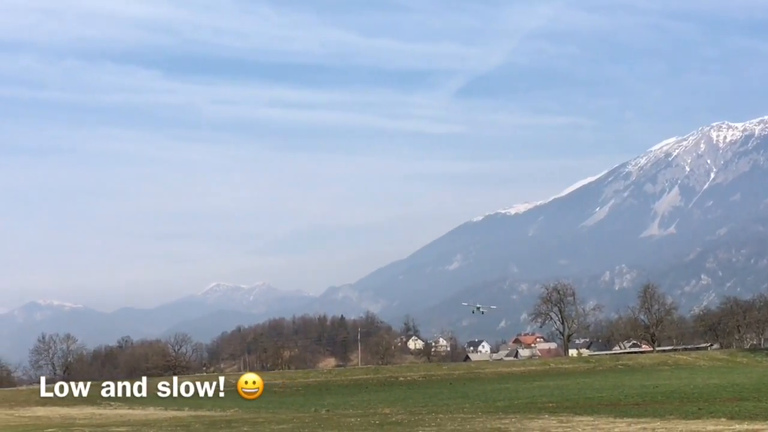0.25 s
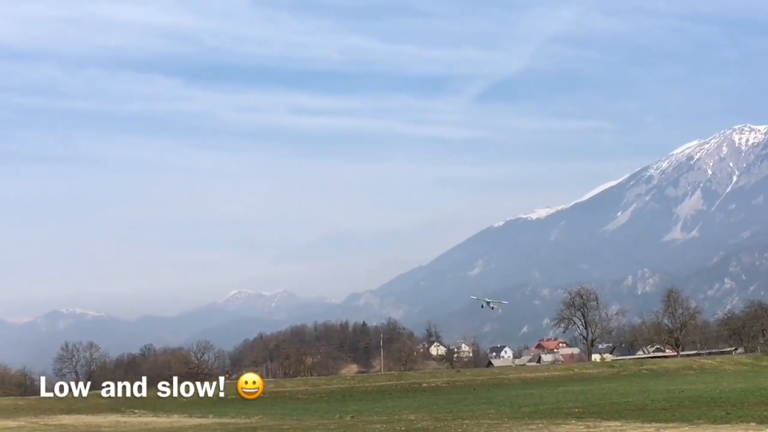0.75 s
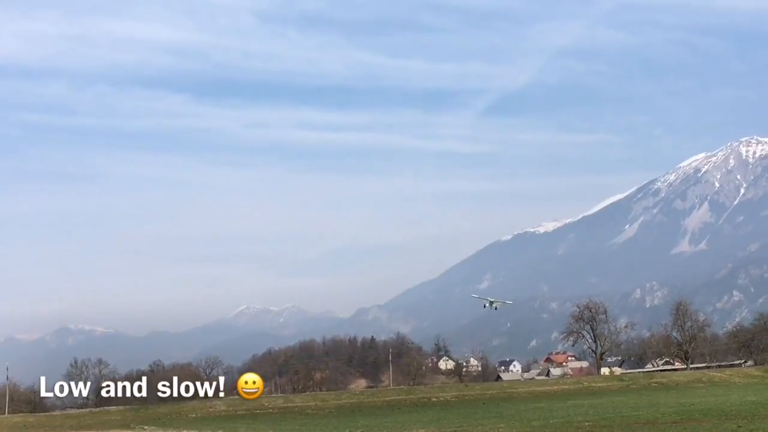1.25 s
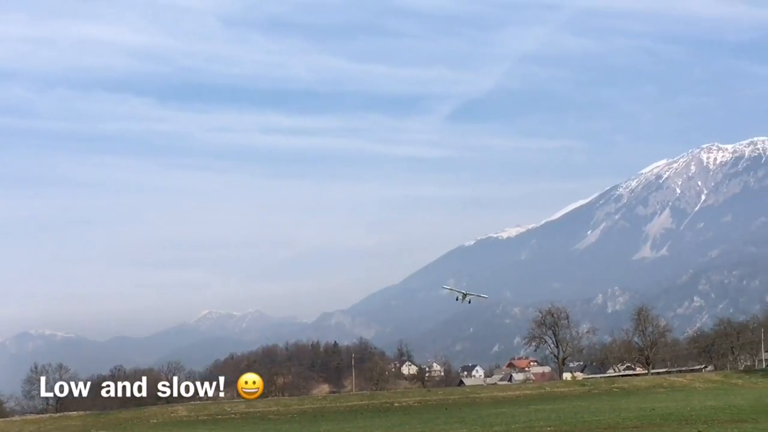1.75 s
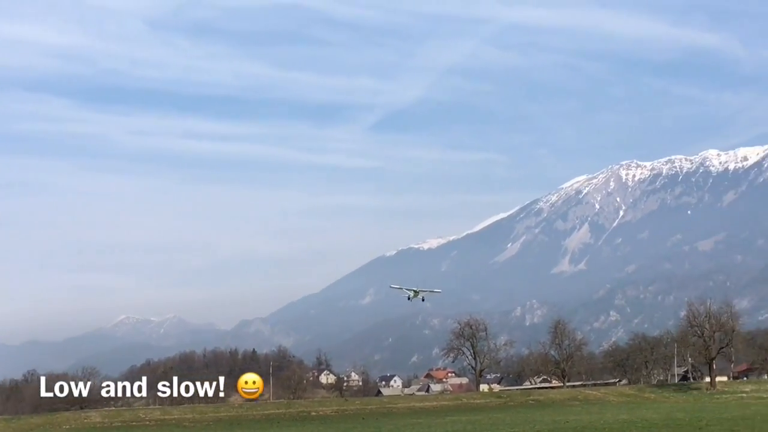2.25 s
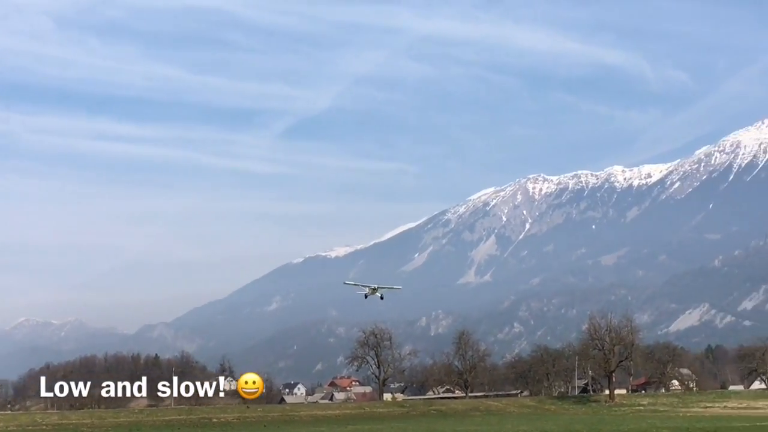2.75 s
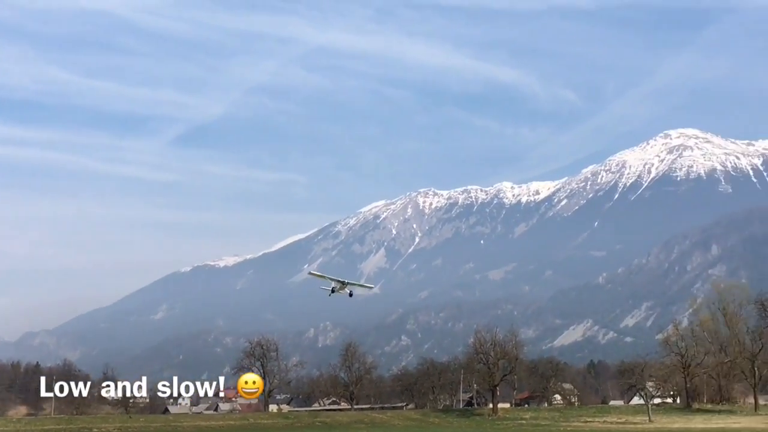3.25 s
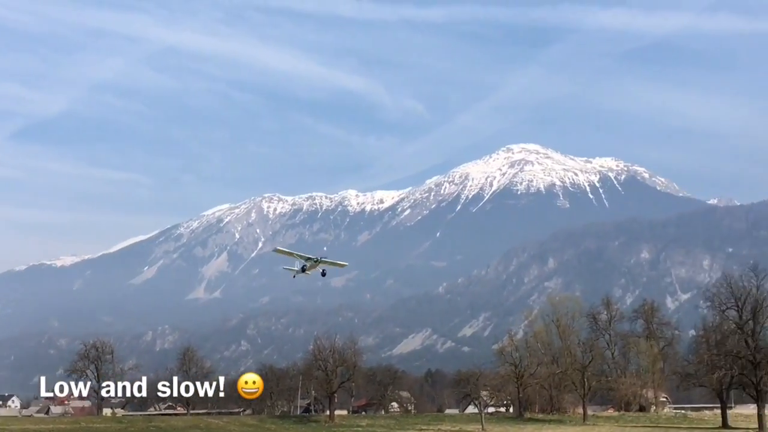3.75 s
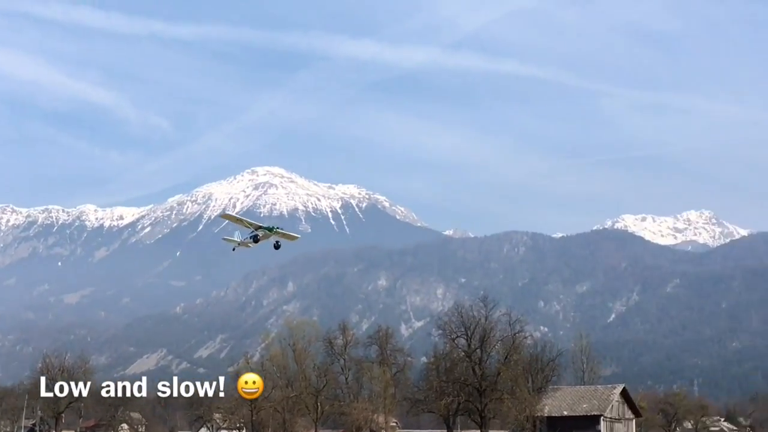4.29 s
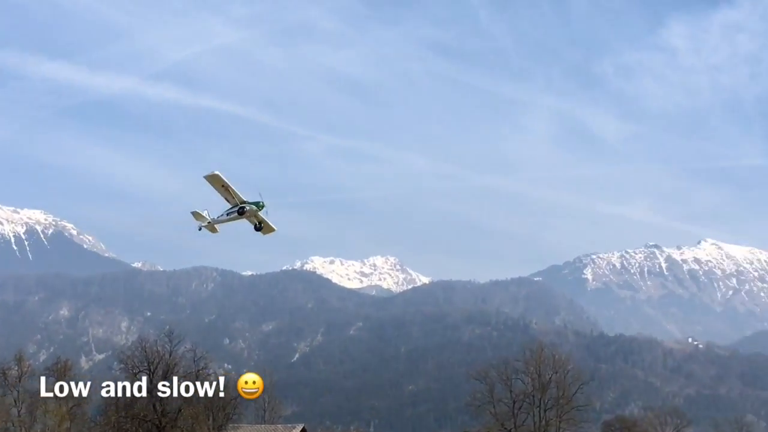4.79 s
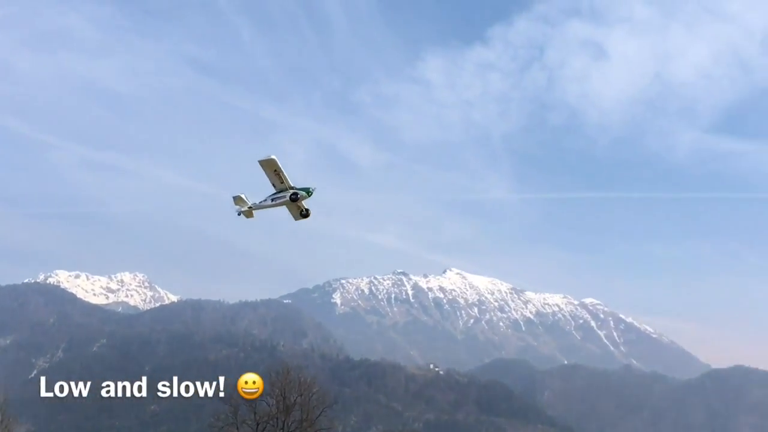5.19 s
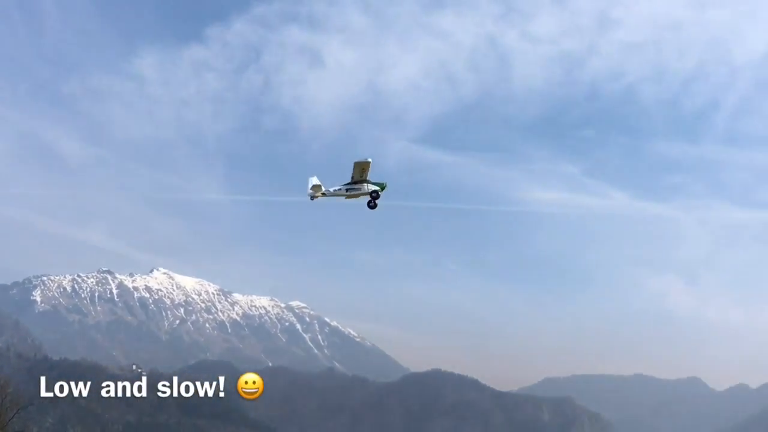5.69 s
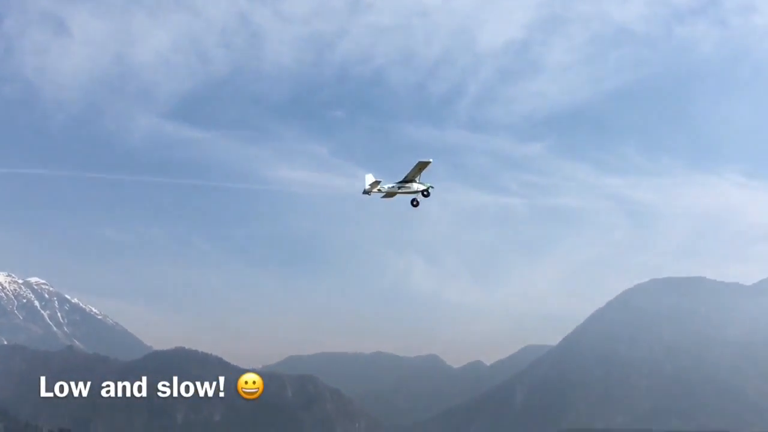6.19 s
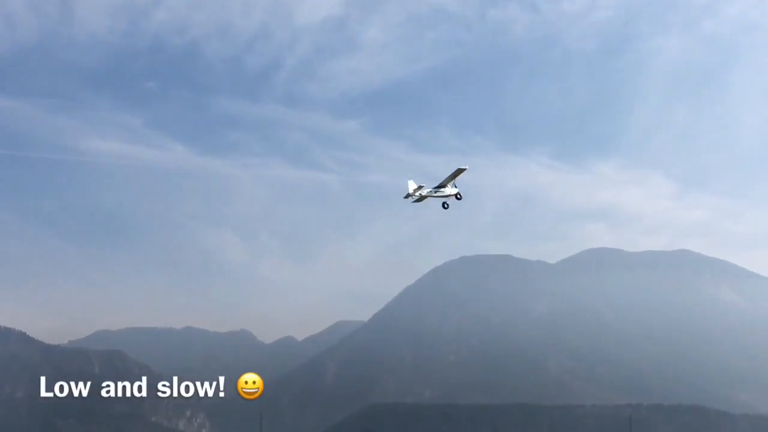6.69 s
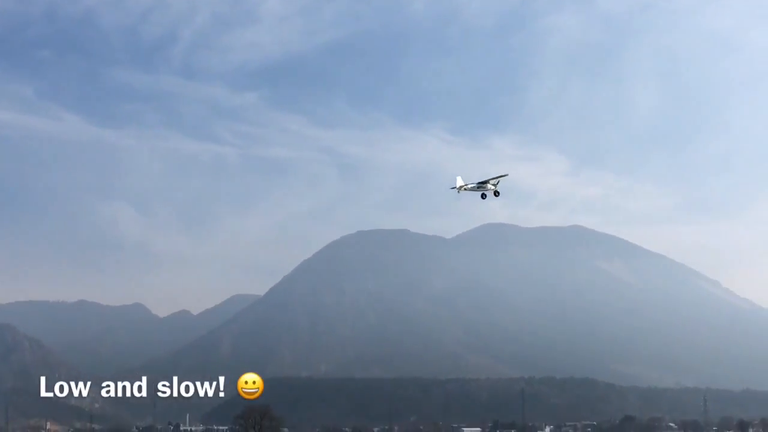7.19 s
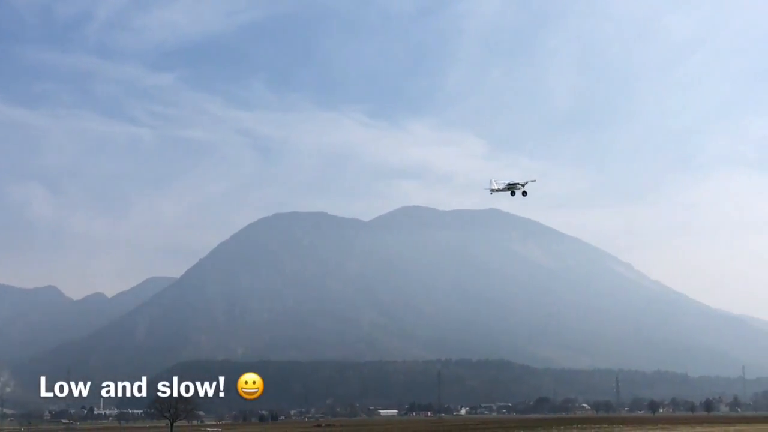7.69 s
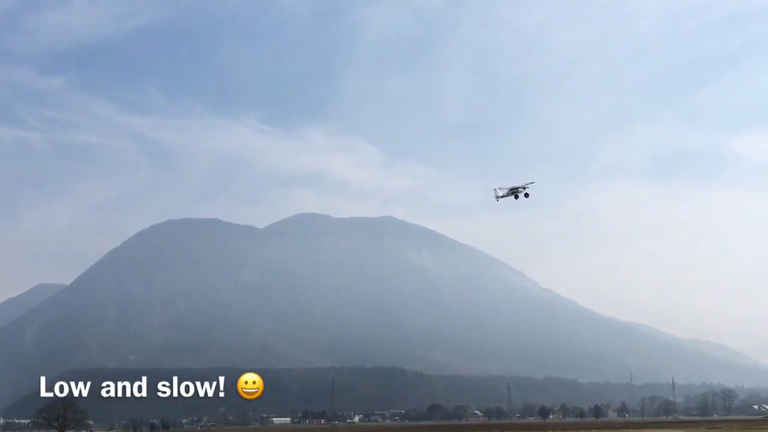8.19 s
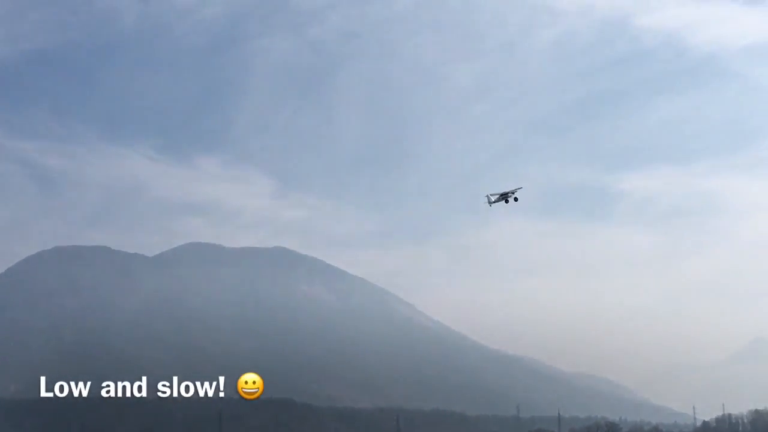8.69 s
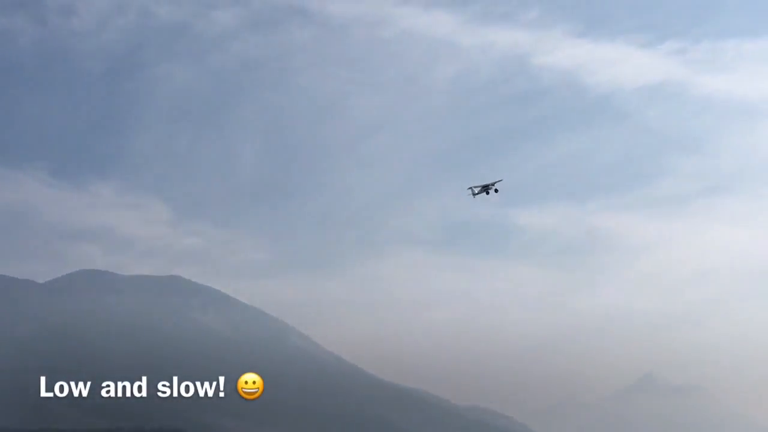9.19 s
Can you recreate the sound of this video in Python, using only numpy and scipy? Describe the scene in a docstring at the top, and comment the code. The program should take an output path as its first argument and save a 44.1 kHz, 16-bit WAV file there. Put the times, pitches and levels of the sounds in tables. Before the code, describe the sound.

Thin electric motor whine and propeller buzz swell past outdoors, sag, then spin up and climb away beneath heavy, low wind buffeting.

```python
"""An open field, microphone 1.5 m above the grass: a small electric plane comes in low, with a brief swell of noise
at the start. A far engine drones up from about 1 s. The 14-pole motor whines on multiples of the shaft speed, and its
speed controller adds a switching tone with sidebands; the propeller buzzes, swishes and hisses, echoed by the ground.
The plane is nearest at 5.27 s, throttles back, then spins up from about 7.4 s to climb away.
Wind rumbles throughout; gusts and eddies, sparse at first and crowded from 4.7 s, buffet the microphone."""
import sys
import numpy as np
from scipy.fft import rfft, irfft, next_fast_len
from scipy.io import wavfile
from scipy.ndimage import map_coordinates

SR = 44100
rng = np.random.default_rng(int(sys.argv[2]) if len(sys.argv) > 2 else 0)


def wav_record(signal):
    """Record a signal, one row per channel, as 16-bit PCM in the file named by sys.argv[1]."""
    frames = np.transpose(np.atleast_2d(signal))
    bounded = np.clip(frames, -1, 1)
    # unit amplitude maps onto the largest positive 16-bit level
    quanta = np.round(bounded * 32767).astype(np.int16)
    wavfile.write(sys.argv[1], SR, quanta)


N = 416744

SOUND_M_PER_S, CRUISE_TURNS_PER_S = 343, 78
# switching tone of the speed controller as heard, gliding down by Doppler shift as the plane passes [t/s, f/Hz]
SWITCHING_TONE = [(0, 7954), (2, 7947), (2.98, 7945), (3.84, 7921), (4.56, 7876), (5.38, 7748), (6.2, 7663),
                  (6.94, 7607), (8.6, 7569), (9.45, 7574)]


def amp(db):
    """Decibels to gain."""
    return 10 ** (np.asarray(db) / 20)


def unit(x):
    """x at rms 1."""
    return x / np.sqrt(np.mean(x ** 2) + 1e-20)


def along(points, hz):
    """(f/Hz, value) points read on a log frequency axis."""
    f, v = np.transpose(points)
    return np.interp(np.log(hz + 1), np.log(f + 1), v)


def curves(rows):
    """One value per sample for each column after the time."""
    s, *cols = np.transpose(rows)
    return [np.interp(np.arange(N) / SR, s, c) for c in cols]


def wobble(rate):
    """A smooth random curve with rate knots a second."""
    knots = rng.standard_normal(1024)
    coarse = np.arange(0, N + 128, 128)  # the curve is worked out every 128 samples
    values = map_coordinates(knots, [coarse * rate / SR], mode="wrap")
    return np.interp(np.arange(N), coarse, values)


def filtered(x, response):
    """x times a response of frequency."""
    size = next_fast_len(N + SR // 4)
    spectrum = rfft(x, size) * response(np.fft.rfftfreq(size, 1 / SR))
    return irfft(spectrum, size)[:N]


def noise(spectrum):
    """Noise of rms 1 with the given colour."""
    white = rng.standard_normal(N)
    return unit(filtered(white, lambda hz: amp(along(spectrum, hz))))


def angle(hz):
    """Running phase of a moving frequency."""
    return 2 * np.pi * np.cumsum(hz) / SR


def tone(phase, db):
    """A sine of the given rms level, from a random starting phase."""
    return np.sqrt(2) * amp(db) * np.sin(phase + rng.uniform(0, 2 * np.pi))


def swell_db(rows):
    """Dips and swells of level, each a smooth bell."""
    t = np.arange(N) / SR
    return sum(db * np.exp(-((t - s) / half) ** 2) for s, half, db in rows)


def flight(pass_s=5.27, distance_m=11, speed_m_per_s=8.665, mic_height_m=1.5):
    """A straight pass at steady speed: nearness in dB, angle off the nose in degrees, lag of the ground echo in s."""
    # the plane climbs [t/s, height/m]
    height = [(0, 1.46), (1, 1.43), (2, 3.54), (3, 3.37), (3.7, 3.35), (4.4, 3.5), (5.1, 3.98), (6.5, 5.7),
              (7.2, 6.23), (8.4, 13), (9.45, 13.8)]
    ahead_m = speed_m_per_s * (pass_s - np.arange(N) / SR)
    range_m = np.hypot(distance_m, ahead_m)
    near_db = 20 * np.log10(distance_m / range_m)
    aspect = np.degrees(np.arctan2(distance_m, ahead_m))
    echo_lag = 2 * mic_height_m * curves(height)[0] / range_m / SOUND_M_PER_S
    return near_db, aspect, echo_lag


def countryside(opening_db=-61.5, opening_s=0.25, valley_db=-68):
    """The soft, even roar of the valley, a brief swell of noise at first, and a far engine as one gliding sine."""
    # a far engine gathering speed [t/s, f/Hz, relative level/dB]
    far_engine = [(1.1, 62, -66), (1.3, 66, -49.5), (1.8, 81, -49.5), (2.2, 89, -52.5), (2.85, 98, -45),
                  (3.2, 99, -72), (4.2, 100, -61), (4.7, 104, -49.5), (5.4, 110, -56.5)]
    # colour of the valley's roar [f/Hz, level/dB per Hz]
    valley_colour = [(100, -36), (250, 1.5), (450, -1), (700, -2), (950, 8), (1400, -0.5), (1900, 0.5),
                     (2400, -10), (5000, -14.5), (15000, -39.5)]
    hz, db = curves(far_engine)
    drone = tone(angle(hz * (1 + 0.013 * wobble(10))), db - 0.5 + 1.5 * wobble(7.3))
    opening = .5 - .5 * np.tanh((np.arange(N) / SR - opening_s) / 0.033)
    opening_colour = [(500, -11), (750, -2), (950, 1.5), (1400, -4), (1900, -26)]
    swell = opening * amp(opening_db) * noise(opening_colour)
    valley = amp(valley_db + 0.29 * wobble(1.74)) * noise(valley_colour)
    return drone + swell + valley


def mount_lift(hz):
    """Decibels gained by a tone that passes through the resonances of the motor and its mount."""
    # resonances and one notch [f/Hz, width/Hz, lift/dB]
    resonances = [(1050, 330, 0), (1650, 140, 15), (2986, 61, 6), (3450, 200, 8.5), (5220, 370, -10),
                  (6203, 316, 12.5)]
    return sum(db / (1 + (2 * (hz - centre) / width) ** 2) for centre, width, db in resonances)


def leading_tones(speed, near_db, aspect, flutter_db=1.24, fading_db=2.6, twin_db=-4, twin_reach_hz=130,
                  throb_depth=0.053, mount_peak_db=13):
    """The strong magnetic tones throb once a turn, flutter in turbulent air and sweep lobes past the microphone."""
    # the three loudest whines, shaft orders 14, 21, 42, rise and fall during the pass [t/s, relative level/dB]
    pole_tone = [(0, -65.5), (.4, -64.5), (.6, -69), (2.55, -67), (3.26, -69.5), (3.8, -55), (4.32, -61.5),
                 (4.72, -49), (5.28, -57), (5.66, -67), (6.4, -53.5), (6.98, -52.5), (7.66, -64),
                 (8.3, -60), (9.45, -58)]
    phase_tone = [(0, -62), (.3, -65.5), (1.02, -75), (1.74, -74), (2.4, -65.5), (3.36, -68.5),
                  (3.92, -56.5), (4.6, -61), (5.02, -47.5), (5.5, -56.5), (5.76, -52.5), (6.46, -52.5),
                  (7.1, -65), (7.5, -56), (7.75, -70), (8.05, -59.5), (8.64, -66.5), (9.45, -57.5)]
    commutation_tone = [(0, -74), (.2, -76), (.28, -58.5), (.8, -64), (1.14, -73.5), (1.5, -59),
                        (1.8, -54.5), (2.45, -64), (2.87, -51.5), (3.15, -58), (3.48, -50.5), (3.8, -60.5),
                        (4.5, -47.5), (4.82, -56), (5.08, -49), (5.35, -59), (5.52, -48), (5.9, -48),
                        (6.8, -50), (7.16, -62), (7.36, -51.5), (7.56, -52), (7.64, -46.5), (7.82, -56.5),
                        (8.28, -46), (8.68, -57), (9.04, -48), (9.45, -48)]
    # brief drop-outs of the loudest whine, order 42 [t/s, half length/s, level/dB]
    whine_dips = [(3.73, .05, -7), (3.92, .04, -9), (4.15, 0.034, -15), (5.65, 0.049, -13), (7.84, .05, -8),
                  (8.1, 0.033, -7.5)]
    # surges and sags of the ring of shaft order 49 [t/s, half length/s, level/dB]
    ring_swells = [(.05, 0.13, 1), (5.52, 0.057, 6), (5.75, 0.098, -9), (6.35, .12, -10), (6.6, 0.092, 8),
                   (7.03, 0.067, 5), (7.6, 0.36, -14)]
    # where the other leading tones lie [multiple of the switching tone, shaft order]
    positions = [(0, 49), (1, 0), (1, -21), (1, -42)]
    # how each of those radiates [relative level/dB, gain ahead/dB, gain along the axis/dB,
    # power of the shaft speed, lobe depth/dB, lobe spacing/deg, lobe aim/deg off the nose]
    radiation = [(-51.5, 2, -31, -9, 14.5, 143, 143), (-50.5, 1.6, -9.5, 1.5, 5, 52.6, 88.7),
                 (-60, 3.5, 1.9, -3, 6, 65, 85.6), (-63.5, -6.5, 2, -0.2, 4, 32.8, 99.4)]

    switching, = curves(SWITCHING_TONE)
    ahead = np.cos(np.radians(aspect))
    speed_db = 20 * np.log10(speed / CRUISE_TURNS_PER_S)
    whines = [(0, 14, curves(pole_tone)[0]),
              (0, 21, curves(phase_tone)[0]),
              (0, 42, curves(commutation_tone)[0] + swell_db(whine_dips))]
    for (carrier, order), row in zip(positions, radiation):
        level_db, ahead_db, axial_db, power, lobe_db, spacing, aim = row
        lobes = np.cos(2 * np.pi * (aspect - aim) / spacing)
        pattern_db = ahead_db * ahead + axial_db * ahead ** 2 + lobe_db * lobes
        db = level_db + near_db + pattern_db + power * speed_db + fading_db * wobble(8)
        whines.append((carrier, order, db))

    # at low throttle shaft order 105 meets the switching tone:
    # sidebands then lie beside orders 21 and 49 and beat with them
    beat_hz = switching - 105 * speed
    beat_db = twin_db - 20 * np.log10(1 + (beat_hz / twin_reach_hz / 2) ** 2)
    out = np.zeros(N)
    for carrier, order, db in whines:
        hz = carrier * switching + order * speed
        db = db + flutter_db * wobble(30) + 0.59 * wobble(11) - .6
        if order == 49:
            db = db + swell_db(ring_swells)
        if order == -21:  # this sideband is loud only inside the mount's top resonance
            db = db + mount_lift(hz) - mount_peak_db
        out += tone(angle(hz), db)
        if order in (21, 49):
            out += tone(angle(hz + beat_hz), db + beat_db)
    return out * (1 + throb_depth * np.cos(angle(speed)))


def lesser_tones(speed, loud_db, aspect, beam_db=6.0, treble_db=-3, fading_db=3.0, sideband_low_hz=1800):
    """Weak shaft orders and sidebands ring through the mount; the high ones beam forward, low sidebands die out."""
    # where the lesser magnetic tones lie [multiple of the switching tone, shaft order]
    positions = [(0, 13), (0, 16), (0, 18), (0, 19), (0, 63), (0, 84), (1, -63), (1, -17), (1, -19),
                 (1, -4), (1, -2), (1, 2), (1, 4), (1, 6), (1, 8), (1, 14)]
    # their strengths, row by row, before mount and distance [relative level/dB]
    strengths_db = [-69, -76.5, -76.5, -74, -68, -67.5, -70, -75.5, -78, -114, -87, -75, -93, -101, -74,
                    -69]
    switching, = curves(SWITCHING_TONE)
    forward_db = treble_db + beam_db * np.cos(np.radians(aspect))
    out = np.zeros(N)
    for (carrier, order), strength_db in zip(positions, strengths_db):
        hz = carrier * switching + order * speed
        treble = np.clip((hz - 4500) / 1500, 0, 1)
        # carrier is 0 for plain shaft orders, which lose nothing
        loss_db = carrier * 10 * np.log10(1 + ((sideband_low_hz / hz) ** 2) ** 2)
        db = strength_db + loud_db + treble * forward_db - loss_db + mount_lift(hz)
        out += tone(angle(hz), db + fading_db * wobble(8))
    return out


def propeller_buzz(speed, near_db, fading_db=4.5, count=46):
    """A slightly unbalanced propeller sounds the multiples of the shaft speed, here from the second up."""
    # strength of the buzz lines before mount and distance [f/Hz, relative level/dB]
    line_strength = [(150, -69), (300, -79.5), (450, -70), (600, -68), (740, -73.5), (880, -65),
                     (1020, -87), (1130, -64.5), (1300, -85), (1850, -82), (2200, -103), (3200, -76.5),
                     (3900, -86), (5000, -75)]
    turn = angle(speed)
    out = np.zeros(N)
    for order in range(2, count):
        hz = order * speed
        db = along(line_strength, hz) + mount_lift(hz) + 2.12 * near_db - 5.0
        out += tone(order * turn, db + fading_db * wobble(6))
    return out


def propeller_air(speed, near_db, aspect, blade_depth=0.16, shaft_depth=0.28, chop_depth=0.5,
                  gusty_db=1.28, slow_db=0.47):
    """Turbulence shed by the two blades, pulsing as they come round."""
    # the propeller's air noise [t/s, swish relative level/dB, tip sizzle relative level/dB]
    air_levels = [(0, -78, -75), (.2, -85, -71), (.37, -78, -64.5), (1.55, -86, -62), (1.87, -88, -59),
                  (2.3, -77, -63), (2.75, -74, -60), (3.5, -69, -54), (4.0, -65.5, -54.5), (4.1, -67, -56),
                  (4.35, -66, -50.5), (5.15, -58.5, -52.5), (5.6, -64.5, -58.5), (6.22, -69, -57.5),
                  (6.7, -67.5, -59), (6.9, -68.5, -62), (7.05, -69, -59.5), (7.17, -73, -65.5),
                  (7.45, -70, -57.5), (7.75, -70, -64), (8.2, -72, -64.5), (8.8, -74, -70.5),
                  (9.45, -70, -67.5)]
    # colours of the air noise, from low to high [f/Hz, level/dB per Hz]
    wash_colour = [(150, 6.5), (400, -12.5), (700, -5.5), (1000, -8), (1500, -3), (2000, -7), (2800, -19.5)]
    swish_colour = [(1500, -51), (2100, -6), (2600, -1.5), (2850, -2), (3100, 6), (3400, -3.5), (3800, -3),
                    (4300, -10.5), (5200, -13.5)]
    hiss_colour = [(3500, 0.5), (4400, -1), (5050, -5.5), (5700, 2.5), (6300, 4.5), (7100, -1), (8000, 2.5),
                   (9000, 1), (10300, 1), (12000, -13)]
    sizzle_colour = [(9000, -28), (10400, -19), (11000, 3.5), (11800, -0.5), (13200, 3), (14500, -1),
                     (15400, 0.5), (16000, -2)]

    swish_db, sizzle_db = curves(air_levels)
    ahead = np.cos(np.radians(aspect))
    # mid treble follows the sizzle: offset abeam, gain ahead, gain along the axis
    hiss_db = sizzle_db - 9.5 - 1.5 * ahead + 1.5 * ahead ** 2
    turn = angle(speed)
    wash = amp(near_db - 60 + 0.27 * wobble(5.2)) * noise(wash_colour)
    swish = amp(swish_db + 7.0) * noise(swish_colour)
    hiss = amp(hiss_db + 7.0) * noise(hiss_colour)
    sizzle = amp(sizzle_db + 0.5) * noise(sizzle_colour)
    chop = 1 + chop_depth * np.cos(2 * turn)  # two blades: twice a turn
    pulsing = 1 + blade_depth * np.cos(2 * turn) + shaft_depth * np.cos(turn)
    flicker = amp(gusty_db * wobble(20) + slow_db * wobble(12))
    return chop * (wash + swish) + pulsing * flicker * (hiss + sizzle)


def over_grass(x, lag, share=0.36, dull_hz=6500):
    """A dulled ground echo whose lag follows height and distance, so a comb sweeps through the sound."""
    t = np.arange(N) / SR
    echo = filtered(x, lambda hz: 1 / (1 + (hz / dull_hz) ** 2))
    return x + share * np.interp(t - lag, t, echo)


def wind(lumps_db=6.5, surge_db=1.0, calm_buffet_db=-64, breeze_db=-51, breeze_rise_db_per_s=0.85,
         attack_s=0.018, release_s=0.04):
    """Wind on the microphone: a slowly rising rumble, and gusts that lift it together with lumpy buffeting."""
    # gusts, one envelope for both layers [t/s, hold/s, rumble relative level/dB, buffet relative level/dB]
    gusts = [(0.287, 0.035, -43, -49), (1.474, 0.034, -41.5, -50), (4.688, 0.043, -36, -38.5),
             (4.8, 0.023, -41, -44), (4.922, 0.14, -42.5, -42), (5.08, .05, -37.5, -51),
             (5.76, 0.17, -40.5, -47.5), (5.873, 0.13, -36.5, -45.5), (6.27, 0.038, -33, -46),
             (6.378, 0.18, -38, -33.5), (6.59, 0.14, -36, -41), (6.744, 0.12, -36, -37),
             (6.996, 0.22, -32, -29.5), (7.105, .13, -29.5, -28.5), (7.316, 0.068, -37.5, -39.5),
             (7.436, .13, -29.5, -40), (7.636, 0.059, -29.5, -35), (7.793, 0.025, -38.5, -60),
             (7.91, 0.056, -34, -29), (8.06, 0.055, -36.5, -41), (8.19, 0.028, -33.5, -51),
             (8.29, 0.011, -39, -54), (8.552, .05, -34.5, -41), (8.653, 0.063, -38, -29.5),
             (8.763, .1, -33.5, -30), (8.93, 0.079, -35, -34.5), (9.01, 0.14, -32, -30),
             (9.206, 0.085, -34.5, -29.5), (9.336, 0.042, -35, -32)]
    # colours of the two layers [f/Hz, level/dB per Hz]
    rumble_colour = [(15, -42), (30, -11), (50, 5), (85, 2), (130, -8), (200, -22.5), (400, -56),
                     (900, -72)]
    buffet_colour = [(30, -20), (70, -6.5), (130, 3.5), (200, -2.5), (300, -12), (450, -23.5), (800, -44),
                     (2000, -81)]
    t = np.arange(N) / SR
    rumble = amp(breeze_db + breeze_rise_db_per_s * t)
    buffet = np.full(N, amp(calm_buffet_db))
    for start, hold, rumble_db, buffet_db in gusts:
        corners = [start - attack_s, start, start + hold, start + hold + release_s]
        gust = np.interp(t, corners, [0, 1, 1, 0])
        rumble = np.maximum(rumble, amp(rumble_db) * gust)
        buffet = np.maximum(buffet, amp(buffet_db) * gust)
    surging = unit(noise(rumble_colour) * amp(surge_db * wobble(18)))
    lumpy = unit(noise(buffet_colour) * amp(lumps_db * wobble(55)))
    return amp(-0.5) * rumble * surging + amp(-2) * buffet * lumpy


def slaps(sharpness=0.76, ragged=0.16, gain_db=-1):
    """Each eddy that slaps the microphone is one push and pull of pressure with a ragged edge."""
    # single eddies [t/s, relative peak level/dB, swing f/Hz before the sharpness factor]
    eddies = [(0.293, -30.5, 122), (1.494, -35, 109), (4.69, -33, 85), (4.915, -19.5, 122),
              (5.024, -21.5, 139), (5.959, -18.5, 121), (6.399, -21, 157), (6.434, -25.5, 200),
              (6.501, -19.5, 181), (6.73, -26, 143), (7.067, -19, 203), (7.112, -11, 243),
              (7.157, -13, 190), (7.228, -21.5, 209), (7.407, -18, 109), (7.453, -18, 113),
              (7.51, -14, 113), (7.552, -18, 110), (7.683, -12.5, 172), (7.909, -18, 124),
              (8.072, -29, 128), (8.203, -25.5, 177), (8.293, -30.5, 200), (8.664, -21.5, 100),
              (8.694, -22, 224), (8.765, -21, 131), (8.836, -11.5, 150), (9.113, -19, 220)]
    out = np.zeros(N)
    t = np.arange(-SR // 20, SR // 20) / SR
    for s, db, hz in eddies:
        u = 2 * np.pi * hz * t * sharpness
        swing = -np.tanh(u) / np.cosh(u)  # peaks at 1/2, hence the 2 below
        first = round(s * SR) - len(t) // 2
        out[first:][:len(t)] += 2 * amp(db + gain_db) * swing
    out *= 1 + ragged * noise([(50, 13.5), (300, -39), (600, -14), (1500, -50)])
    return filtered(out, lambda hz: (1j * hz / (1j * hz + 40)) ** 2)  # the microphone sheds the deepest bass


def scene(abeam_db=3.0, aft_db=1.5, throttle_power=2.54):
    """The plane, louder when near, from behind and when its shaft turns faster; the wind and the valley."""
    # shaft speed as heard: cruise, throttle back, climb [t/s, turns per second]
    shaft_speed = [(0, 70), (.23, 69.9), (.33, 74), (.46, 76.3), (.6, 77.15), (.86, 77.9), (1.74, 78.45),
                   (2.56, 77.9), (2.9, 78.7), (3.6, 78.95), (4.06, 78.2), (4.56, 78), (4.8, 77.2),
                   (5.06, 77.8), (5.26, 76.6), (5.52, 73.6), (5.68, 72.85), (6.1, 73.35), (6.5, 72.7),
                   (7.16, 73.6), (7.44, 75.9), (7.62, 78.8), (7.72, 84.6), (7.84, 90.4), (8.09, 97.7),
                   (8.2, 102.8), (8.32, 103.6), (8.54, 102.7), (9.45, 102.8)]
    # the weaker tones and the buzz dip and swell together [t/s, half length/s, level/dB]
    shared_swells = [(.1, 0.13, -2), (1.042, 0.16, -7), (3.453, 0.5, 1.5), (4.25, 0.3, -1.5),
                     (6.45, 0.18, 0), (7.42, 0.31, 3), (7.85, .16, -6.5), (9.31, 0.13, 2)]
    speed = curves(shaft_speed)[0] * (1 + 0.000568 * wobble(30))
    near_db, aspect, echo_lag = flight()
    throttle_db = throttle_power * 20 * np.log10(speed / CRUISE_TURNS_PER_S)
    loud_db = abeam_db + near_db - aft_db * np.cos(np.radians(aspect)) + throttle_db
    drift_db = swell_db(shared_swells)
    motor = leading_tones(speed, near_db + drift_db, aspect) + lesser_tones(speed, loud_db + drift_db, aspect)
    buzz = propeller_buzz(speed, loud_db + 0.45 * drift_db)
    propeller = over_grass(buzz + propeller_air(speed, loud_db, aspect), echo_lag)
    return (motor + propeller + wind() + slaps() + countryside())[None]


def record(dry, top_hz=15720):
    """The recorder keeps nothing above its band limit."""
    return filtered(dry[0], lambda hz: hz < top_hz)[None]


dry = scene()
out = record(dry)
wav_record(out)
```